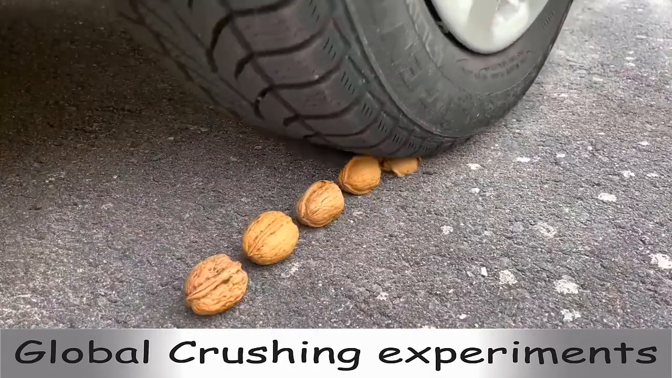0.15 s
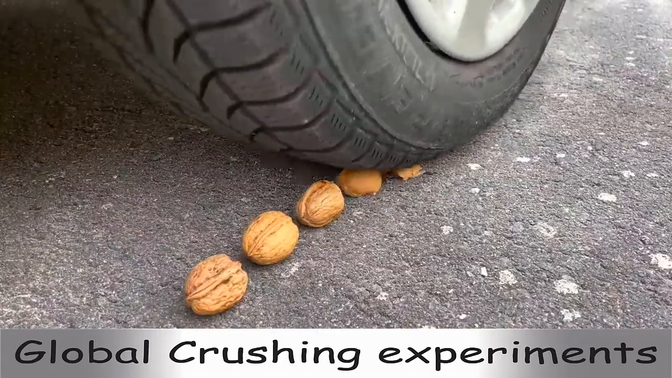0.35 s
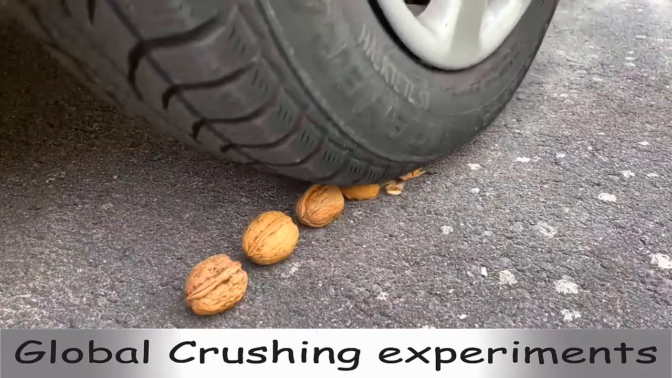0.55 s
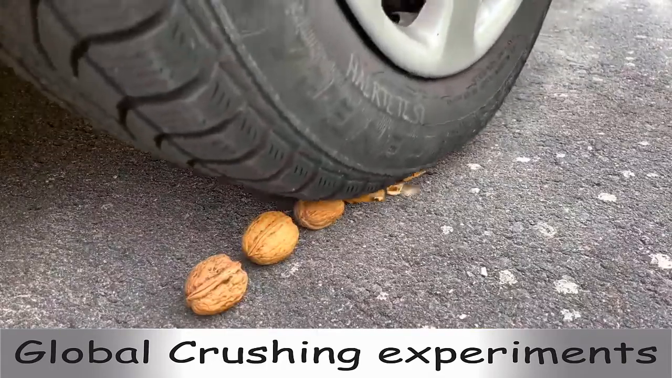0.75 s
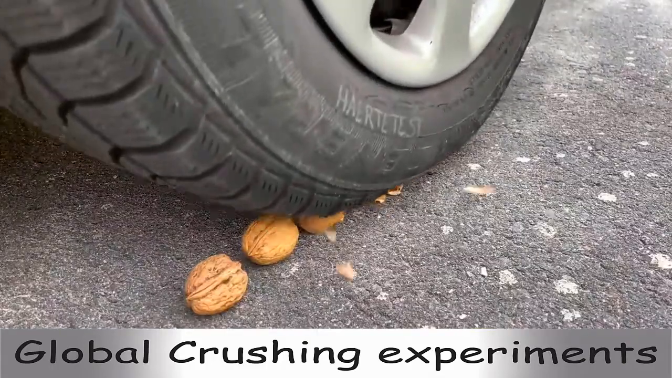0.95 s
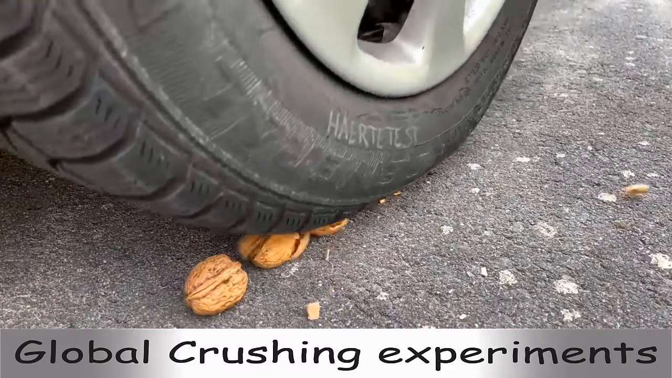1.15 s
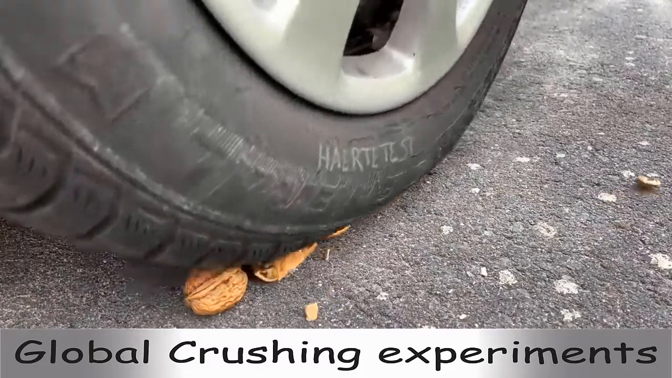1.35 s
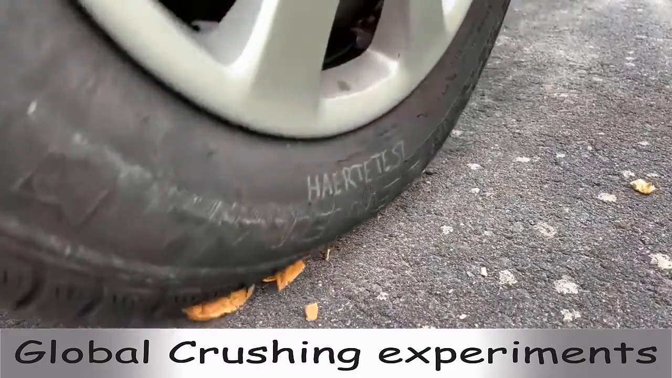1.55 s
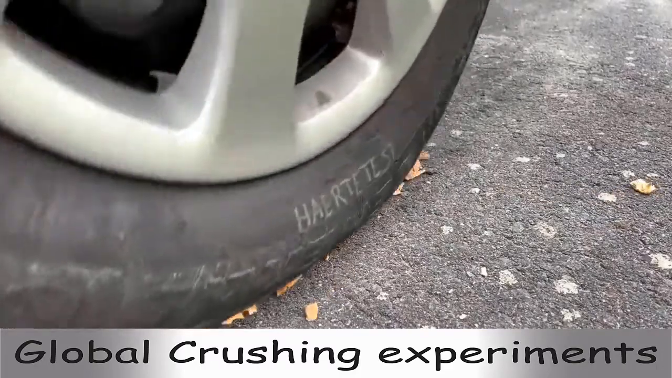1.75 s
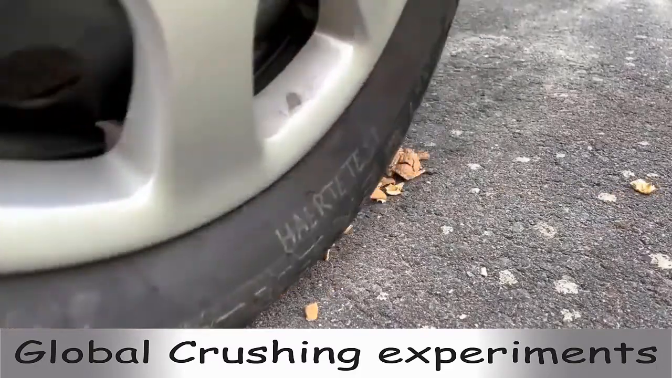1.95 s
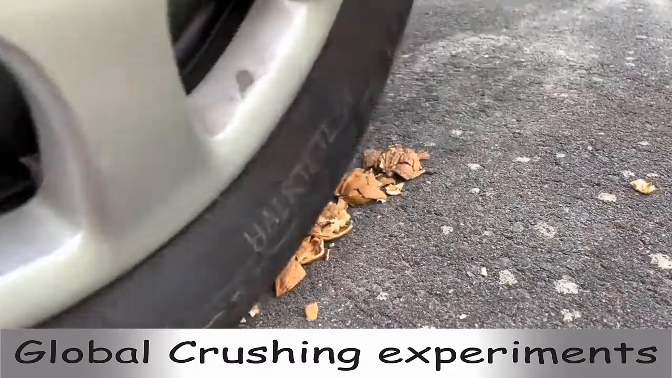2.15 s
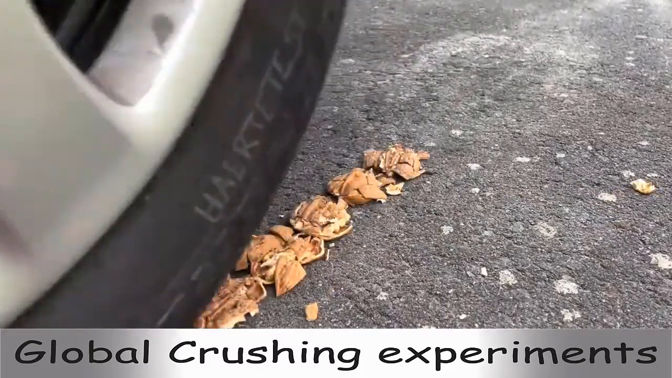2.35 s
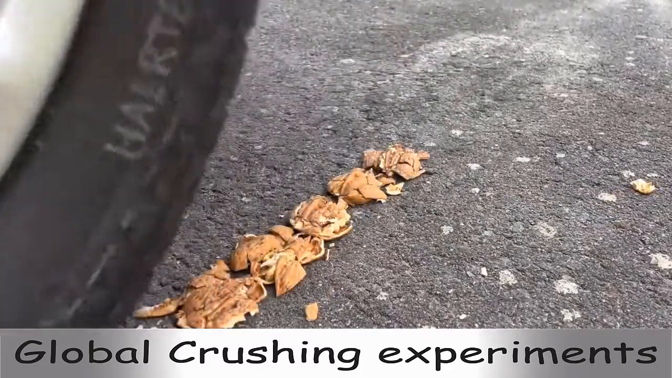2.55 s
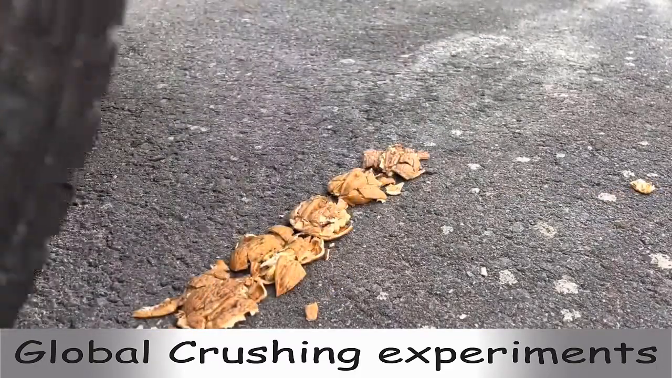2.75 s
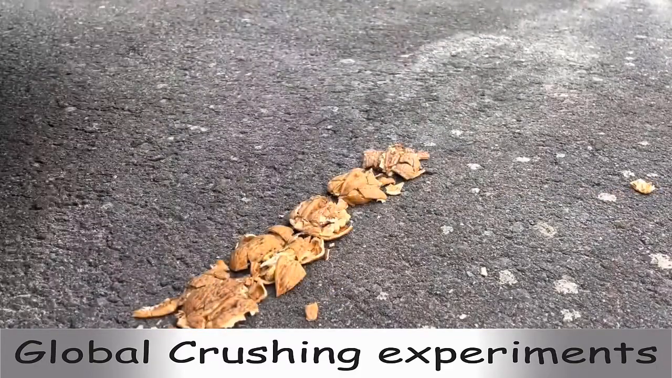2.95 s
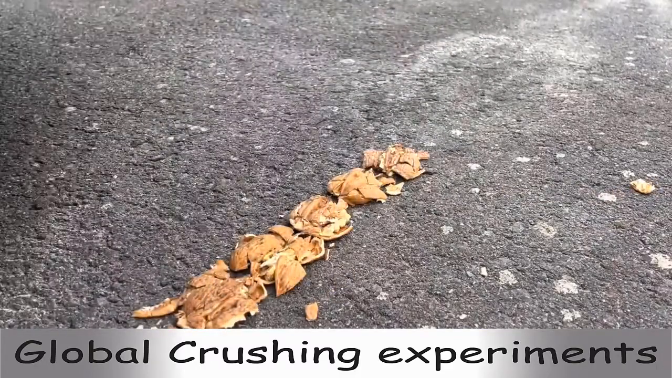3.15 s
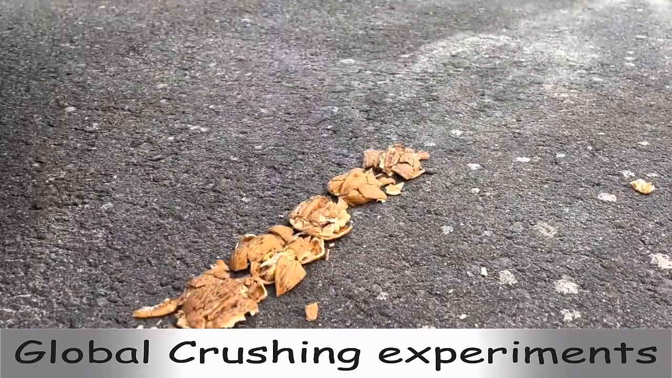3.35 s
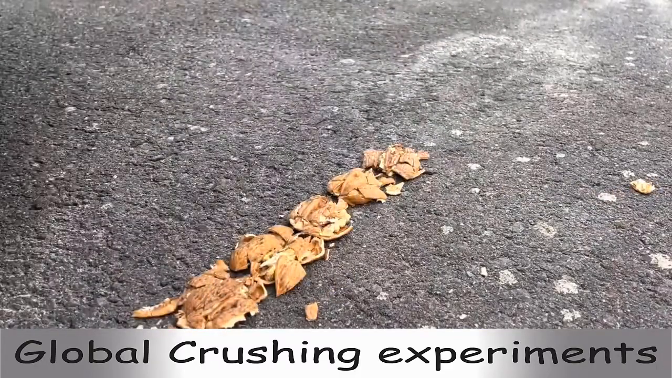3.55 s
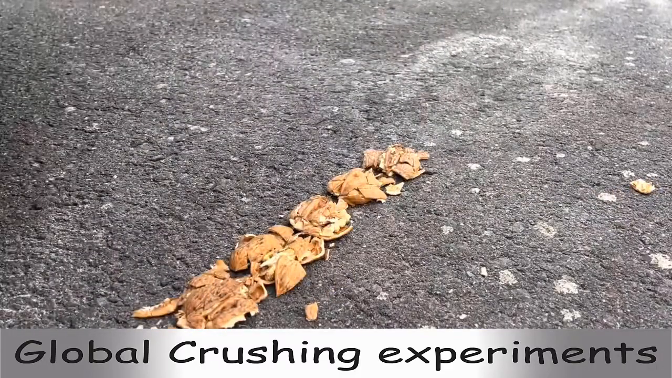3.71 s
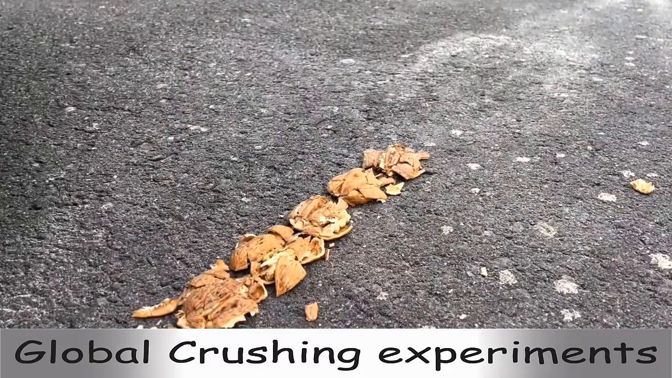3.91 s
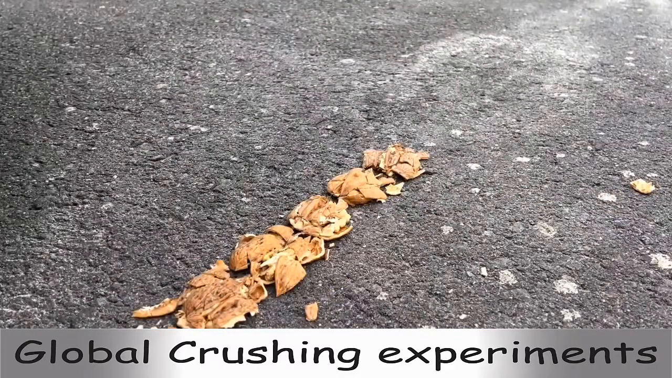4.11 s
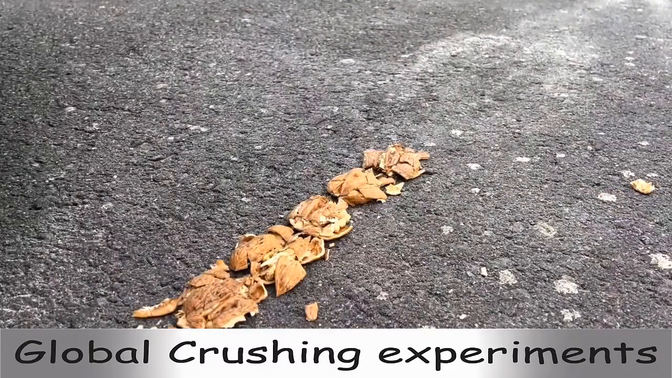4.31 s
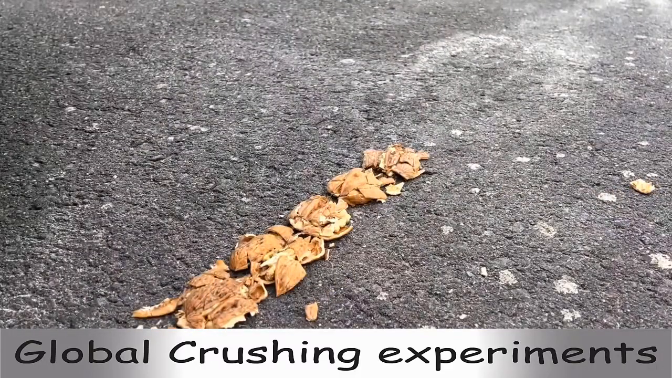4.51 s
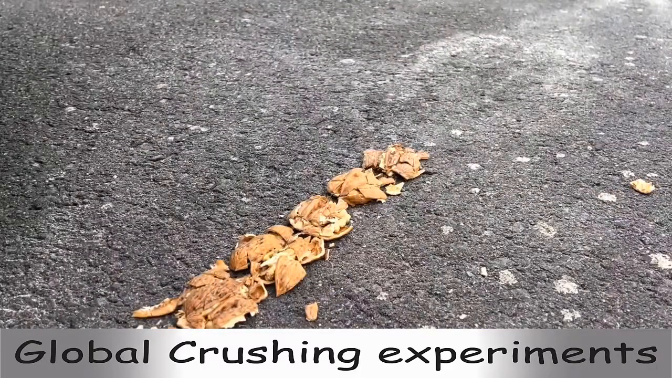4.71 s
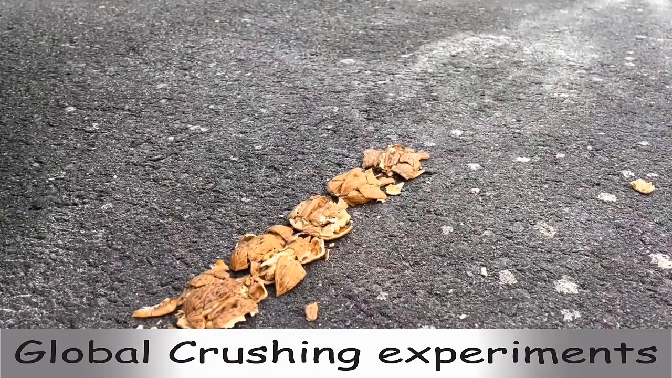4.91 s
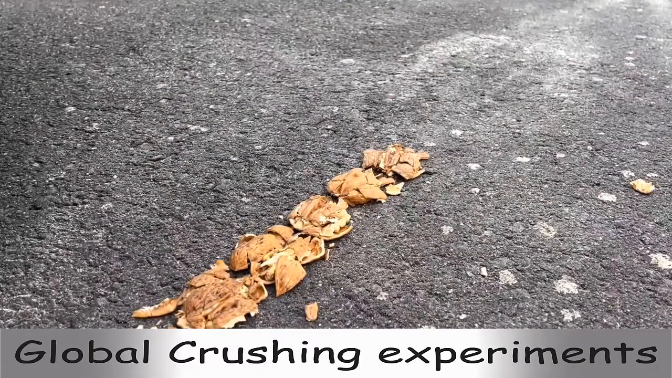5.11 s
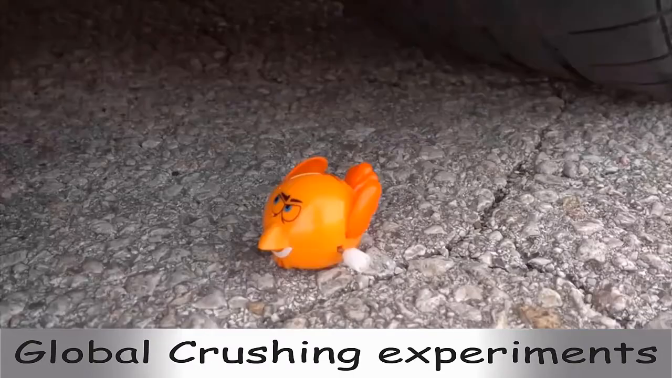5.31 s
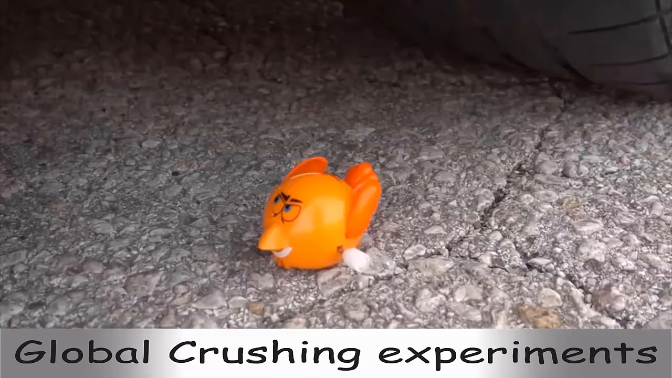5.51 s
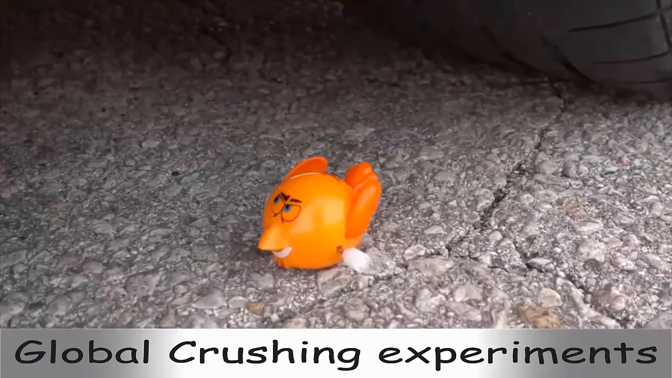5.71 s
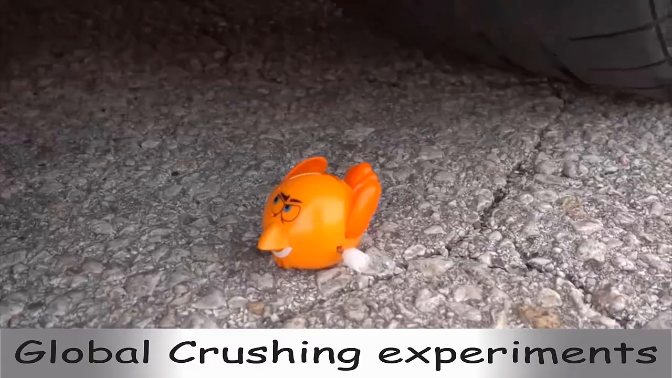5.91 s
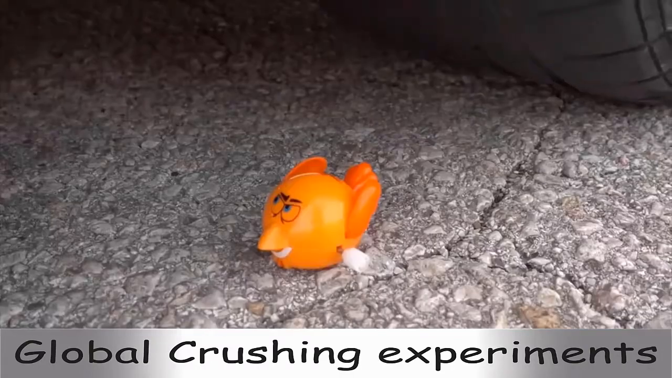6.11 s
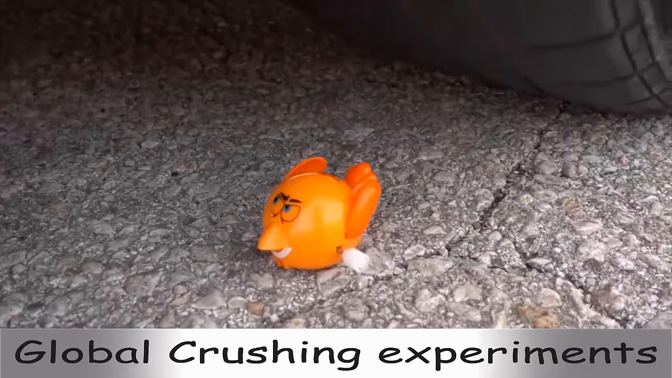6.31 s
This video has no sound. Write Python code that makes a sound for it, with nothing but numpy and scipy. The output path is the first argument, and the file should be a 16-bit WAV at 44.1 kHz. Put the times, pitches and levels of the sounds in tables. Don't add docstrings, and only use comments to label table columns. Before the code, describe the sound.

Loud brittle shell cracks come in irregular clusters, with woody pops, splintering ticks and gritty kernel crumble, one hard knock standing out late. The breaking stops and leaves a soft, throbbing car idle with faint whine and a brief tiny squeak. A short rustle, then the engine is gone and rough low gusts thump a close outdoor microphone over faint distant wind.

```python
import sys
import numpy as np
from scipy import signal
from scipy.fft import rfft, irfft, next_fast_len
from scipy.io import wavfile
from scipy.ndimage import uniform_filter1d, minimum_filter1d

SR = 44100
rng = np.random.default_rng(int(sys.argv[2]) if len(sys.argv) > 2 else 0)


def linear_from_db(decibels):
    return 10 ** (np.asarray(decibels, float) / 20)


def pcm_store(signal):
    levels = np.round(np.clip(np.atleast_2d(signal), -1, 1) * 32767)
    wavfile.write(sys.argv[1], SR, levels.astype(np.int16).T)


N = 284974
T = np.arange(N) / SR

# (frequency [Hz], level [dB])
SNAP_SPECTRUM = [(900, -10), (1500, -7.5), (2000, -4.5), (2800, -4), (4700, -1.5), (6500, -2.5),
                 (9000, 0.5), (12000, -5.5), (15500, -10)]
# (frequency [Hz], level [dB])
TAIL_TREBLE = [(2500, 2.5), (6000, -5), (12000, -6)]
# (start [s], end [s])
CHANGE_S = (5.3405, 5.3958)
NUT_HZ = 981.6
LEAVE_S = 1.8


def evened(x):
    return x / np.sqrt(np.mean(x ** 2, axis=-1, keepdims=True) + 1e-20)


def read(points, hz, axis=1):
    columns = np.transpose(points)
    return np.interp(np.log(hz + 1), np.log(columns[0] + 1), columns[axis])


def curves(rows):
    s, *columns = np.transpose(rows)
    return [np.interp(T, s, c) for c in columns]


def window(t0, t1, edge):
    return np.clip((T - t0) / edge, 0, 1) * np.clip((t1 - T) / edge, 0, 1)


def add(mix, s, sound):
    part = mix[..., round(s * SR):][..., :sound.shape[-1]]
    part += sound[..., :part.shape[-1]]


def colour(x, points):
    size = x.shape[-1]
    return irfft(rfft(x) * linear_from_db(read(points, np.fft.rfftfreq(size, 1 / SR))), size)


def noise(points):
    return evened(colour(rng.standard_normal((2, next_fast_len(N))), points)[:, :N])


def drift(hz):
    size = next_fast_len(N)
    z = rfft(rng.standard_normal(size))
    return evened(irfft(z * np.exp(-(np.arange(len(z)) * SR / N / hz) ** 2), size)[:N])


def ports(pair, table, right_db):
    size = next_fast_len(N)
    hz, z = np.fft.rfftfreq(size, 1 / SR), rfft(pair, size)
    same = np.clip(read(table, hz), 0, 1)
    shared = same * z[0] * np.exp(-1j * read(table, hz, axis=2))
    right = shared + np.sqrt(1 - same ** 2) * z[1]
    return np.array([pair[0], linear_from_db(right_db) * irfft(right, size)[:N]])


def breaks():
    # (time [s], snap [dB], brightness [dB], ring [dB], ring frequency [Hz])
    splits = [(0.052, -12.5, -6.5, -29, 1201), (0.0825, -15.5, -2, -21, 1275),
              (0.0916, -19, -0.5, -24, 777), (0.1241, -16, -3.5, -37.5, 761), (.165, -23, 2, -32.5, 854),
              (0.3479, -23, -9.5, -27.5, 1233), (0.4858, -23.5, -2, -32, 1132),
              (0.63, -15.5, -9.5, -19.5, 1004), (0.651, -15.5, -3, -19.5, 434.4),
              (0.674, -12, -9, -25, 450.4), (0.783, -14.5, 1.5, -19.5, 765.3),
              (1.0395, -13.5, 12, -30.5, 1545), (1.08, -16.5, 3.5, -24.5, 846),
              (1.2136, -15.5, -7.5, -12, 1025), (1.3888, -12, 2.5, -15.5, 450),
              (1.404, -24.5, -1.5, -29.5, 1029), (1.599, -28, -4, -24, 1205),
              (1.6255, -20, -8.5, -16, 1190), (1.636, -18.5, -2, -8, 956), (1.6429, -32.5, -8, -25, 920),
              (1.6838, -21.5, -1.5, -23.5, 1139)]
    # (time [s], snap [dB], brightness [dB], ring [dB])
    snaps = [(0.2932, -25, -9.5, -27.5), (0.2974, -18, -4, -26.5), (0.3611, -21, -3, -25.5),
             (0.4017, -18, -3, -28), (.424, -25, -8.5, -35), (0.5425, -27.5, -4, -36),
             (0.5548, -13, 4.5, -15.5), (0.6343, -17, -5.5, -16.5), (0.777, -16.5, 1.5, -17.5),
             (0.8004, -25.5, -2, -30), (0.8286, -27.5, 3, -28.5), (1.0007, -16.5, -1.5, -24),
             (1.227, -32.5, 2, -32.5), (1.32, -36.5, -1, -27.5), (1.4339, -26, 1, -42.5),
             (1.45, -25, 0, -26.5), (1.5221, -20, -2, -18), (1.5364, -23, 2.5, -31),
             (1.7244, -28.5, -13, -22.5), (1.7388, -22, -5, -16.5), (1.7446, -21, 0.5, -35),
             (1.78, -23.5, 0.5, -27.5), (1.8026, -31.5, -3, -32.5)]
    # (time [s], snap [dB], ring [dB], ring frequency [Hz])
    tears = [(0.0402, -25, -38.5, 920), (0.0491, -23.5, -29.5, 1180), (0.0634, -15.5, -18, 859),
             (0.2233, -18, -16, 969), (0.236, -20.5, -23, 1427), (0.282, -30, -39, 925),
             (0.6174, -15, -17.5, 794), (0.6649, -21.5, -34.5, 793.5), (0.6953, -27, -46.5, 920),
             (0.876, -33, -33, 700), (1.0438, -12.5, -22.5, 700), (1.055, -27.5, -24.5, 740),
             (1.2, -43, -55.5, 1143), (1.5695, -18, -12, 952), (1.6515, -33.5, -26, 1138),
             (1.835, -36.5, -35.5, 942)]
    # (time [s], snap [dB], brightness [dB])
    chips = [(0.1867, -20, 2), (0.2577, -27, -3), (0.2735, -26, 5.5), (0.429, -28.5, 4.5),
             (0.505, -25.5, 2.5), (0.5248, -30.5, 10.5), (.707, -16.5, 0), (.733, -21.5, 2.5),
             (0.7683, -25.5, 7.5), (.9213, -40, 9), (0.952, -35.5, 3.5), (.648, -14.5, -1.5),
             (1.2418, -32, 1.5), (1.421, -30, 0.5), (1.728, -31, 5), (1.8311, -21, 7.5), (1.9047, -32, 7.5)]
    # (time [s], snap [dB], ring [dB], ring frequency [Hz])
    crumbs = [
        (2.731, -66, -55.5, 1500),
        (2.847, -69, -59, 1893),
        (3.109, -60, -59, 2073),
        (6.416, -43, -28, 620),
        (6.4555, -68, -22, 516),
    ]
    nut_hz = NUT_HZ * (1 + 0.024 * rng.standard_normal(len(snaps)))
    rows = [row + (1.1,) for row in splits]
    rows += [row + (hz, 1.1) for row, hz in zip(snaps, nut_hz)]
    for s, db, ring_db, hz in tears:
        bright_db = -1 - 0.06 * (db - ring_db)
        rows.append((s, db, bright_db, ring_db, hz, 1.9))
    rows += [(s, db, bright_db, db - 20.5, NUT_HZ, 1) for s, db, bright_db in chips]
    rows += [(s, db, -23, ring_db, hz, 3.8) for s, db, ring_db, hz in crumbs]
    return rows


def splinters():
    # (time [s], snap [dB], brightness [dB],
    # ring relative to snap [dB])
    ticks = [(0.0146, -40, -6, -13.5), (0.0333, -39.5, 29, -16), (0.0886, -18.5, 0, -9.5),
             (.0957, -20, -0.5, -2), (.0995, -25.5, -1, -6), (.252, -29.5, 1, -9.5), (.315, -37, 0, -12),
             (0.341, -37.5, 1.5, -11), (.438, -36, 2, -11), (.574, -39, 4, -7.5), (.604, -42.5, -7, -11),
             (0.622, -21.5, -2, -8), (.626, -15, -1, -5), (0.637, -25, 0, -5.5), (.657, -21.5, 2.5, -5.5),
             (.721, -34.5, -6.5, -6), (0.7525, -34.5, 1.5, -11), (.763, -31.5, 0, -7.5),
             (0.7817, -17, 0, -15.5), (.790, -21.5, -5, 1), (.840, -40.5, 8, -12), (.913, -42.5, 1, -3),
             (0.9447, -40, 6, -11), (.960, -40, 7, -12.5), (0.9712, -38.5, -0.5, -19.5),
             (1.0145, -35.5, 5, -8.5), (1.0495, -27.5, -2.5, 4), (1.07, -32, 2, -6), (.8746, -22.5, -2, -1),
             (1.174, -43.5, 3, -15), (1.240, -36, 8.5, -7.5), (1.263, -36.5, -3.5, -7.5),
             (1.292, -41.5, 3.5, -5), (1.378, -37, 1.5, 4), (1.384, -28.5, 2, 3.5), (1.3862, -18.5, 3, -10),
             (1.396, -27.5, -5.5, 8.5), (1.424, -23, -2.5, -12), (1.4418, -31.5, 1, -11.5),
             (1.483, -39, 2.5, -15), (1.564, -27, 3.5, -3.5), (1.588, -35, -0.5, -6), (1.640, -26, 2, -4),
             (1.767, -47, -8, -14.5), (1.773, -42.5, -2, -12.5), (1.839, -27.5, 4, -15.5),
             (1.846, -41.5, 7, 5.5), (2.941, -57, -1, -5), (1.908, -37, -19, -19),
             (.0476, -22, -1.5, -24), (.0565, -23, 9, -10), (.0715, -33, -12, 5), (.6155, -26, 2, -12),
               (.704, -22, 2, -22), (.82, -40, -4, -8), (.8845, -52, 15, -16), (1.0465, -25.5, -9, 5),
               (1.0765, -23.5, -1, -6), (1.147, -47.5, 7, -9.5), (1.165, -43, 8.5, -14.5),
               (1.2355, -45, 7, 3), (1.267, -41, 1, -12), (1.6385, -32.5, -4.5, 12.5),
               (2.671, -67.5, 2, -10), (2.909, -66, -6, 0), (3.086, -68, -6, 1.5), (6.394, -58, -4.5, 6),
               (6.4175, -51, 6, -6), (6.426, -53, -7, 2)]
    return [(s, db, bright_db, db + ring_db, NUT_HZ, 0.8) for s, db, bright_db, ring_db in ticks]


def crack(s, snap_db, bright_db, ring_db, hz, ms):
    t = (np.arange(3072) - 512) / SR
    before, after = np.minimum(t, 0), np.maximum(t, 0)
    spit = np.exp(before / 0.00039 - after / (ms * 0.00094))
    scatter = linear_from_db(-17.5 - 60 * after / 0.096 + 60 * before / (0.018 * ms))
    tilt = [(4000, -0.45 * bright_db), (11000, 1.5 * bright_db)]
    peaks_db = np.linspace(2.5, 6, num=16) * rng.standard_normal(16)
    shard = np.transpose([np.geomspace(1500, 15000, num=16), peaks_db])
    hiss = colour(rng.standard_normal((2, len(t))), SNAP_SPECTRUM)
    hiss = evened(colour(colour(hiss, tilt), shard)).clip(-2, 2)
    size = np.sqrt(np.mean((spit + scatter) ** 2))
    snap = evened(hiss * spit + colour(hiss, TAIL_TREBLE) * scatter) * size

    lag = t - 0.00058
    before, after = np.minimum(lag, 0), np.maximum(lag, 0)
    hollow = [(0.04 * hz, -14), (0.26 * hz, -3), (hz, 0), (1.19 * hz, -4), (2.0 * hz, -18), (5 * hz, -50)]
    thud = evened(colour(rng.standard_normal((2, len(t))), hollow)) * linear_from_db(-2.5 - 60 * after / 0.037)
    fade = linear_from_db(-60 * after / 0.016) + linear_from_db(4 - 60 * after / 0.0088)
    ring = np.sin(2 * np.pi * (hz * after + 0.091 * rng.random((2, 1)))) * fade
    knock = evened((ring + thud) * np.exp(before / 0.00026)) * 0.16
    return s - 512 / SR, linear_from_db(snap_db + 2.0) * snap + linear_from_db(ring_db + 3.0) * knock


def pings():
    # (time [s], level [dB], frequency [Hz])
    freed = [(0.0522, -23, 3940), (0.064, -27.5, 1620), (0.1246, -18, 4705), (0.2237, -14.5, 1910),
             (0.402, -18.5, 5800), (.486, -18, 5400), (0.555, -17.5, 3500), (.6178, -13.5, 1900),
             (.6305, -15, 4830), (0.6492, -11.5, 2090), (.707, -20.5, 5920), (0.7774, -17, 5900),
             (0.7822, -15, 3400), (0.875, -20, 4870), (1.0004, -12.5, 4550), (1.043, -11.5, 1790),
             (1.079, -12.5, 5700), (1.2132, -17, 3130), (1.388, -13, 1945), (1.424, -25, 6900),
             (1.522, -13, 5900), (1.5683, -21, 6200), (1.638, -22, 6280), (1.6823, -21, 4400)]
    out, t = np.zeros(N), np.arange(1500) / SR
    for s, db, hz in freed:
        tone = np.sin(2 * np.pi * hz * t) * np.clip(t / 0.0002, 0, 1)
        add(out, s, linear_from_db(db - 60 * t * hz / 33) * tone)
    return out


def aftermath(s, db, fade_s, rest_db):
    jolts = np.bincount(np.round(s * SR).astype(int), linear_from_db(2 * db), N)
    decay = np.exp(-2 / (fade_s * SR))
    return np.sqrt(signal.lfilter([1], [1, -decay], jolts) + linear_from_db(2 * rest_db))


def grit(rows):
    opening = (0.0027, -2.5, 0, -27, 0, 0)
    s, snap_db, _, ring_db, *_ = np.transpose(rows + [opening])
    fizz = aftermath(s, snap_db - 26.5, 0.016, -54)
    grind = aftermath(s, ring_db - 19.5, 0.019, -57)
    size = linear_from_db(3 * np.minimum(rng.exponential(1, N), 4)) * (rng.random(N) < 900 / SR)
    grains = evened(0.5 + signal.lfilter([1], [1, -0.975], size))
    crunch = noise([(250, -21.0), (600, -2.0), (1000, 3.0), (1600, -17), (2500, -25.0)])
    sound = fizz * colour(noise(SNAP_SPECTRUM), TAIL_TREBLE) + grind * crunch
    return window(-1, 1.92, 0.059) * grains * sound


def knocks():
    # (time [s], level [dB], direction [+-1], fade [ms])
    hits = [
        (0.2215, -14, 1, 5.5),
        (0.6733, -12.5, 0.91, 14),
        (1.3876, -3.5, -1.2, 14),
        (1.632, -17, -0.45, 1.6),
    ]
    # (time [s], level [dB], frequency [Hz], length [s])
    tyre_drop = (1.47, -30, 48., .17)
    out, t = np.zeros(N), np.arange(90, 4000) / SR
    for s, db, way, ms in hits:
        sweep = np.cos(np.pi * np.log(t / 3e-3) / np.log(1.52))
        fade = np.exp(-(t - 3e-3) / (ms * 0.00093)) * np.clip((t - t[0]) / 0.0015, 0, 1)
        add(out, s + t[0], way * linear_from_db(db) * sweep * fade)
    s, db, hz, length = tyre_drop
    t = np.arange(round(length * SR)) / SR
    add(out, s, linear_from_db(db) * np.sin(2 * np.pi * hz * t) * np.hanning(len(t)))
    return np.array([out, out])


def pipe(hz):
    # (frequency [Hz], half width [Hz])
    modes = [(278, 14), (385, 12), (520, 16)]
    return 0.3 + sum(1 / np.hypot(1, (hz - f) / width) for f, width in modes)


def firing_orders(hz, turns, exhaust_db, intake_db):
    # (multiple of the firing rate [1], level [dB])
    orders = [(1, -9.5), (2, -10), (3, -4.5), (4, -13.5), (5, 0.5), (6, -1.5), (7, -19.5), (8, -26.5),
              (9, -12), (10, -21), (11, -13.5), (12, -25), (13, -23), (14, -23), (15, -17.5), (10.5, -19),
              (5.5, -22.5), (2.5, -21), (19, -24), (20, -19), (21, -29.5)]
    limp = 1 + 0.45 * np.cos(np.pi * turns)
    hum = np.zeros((2, N))
    for k, db in orders:
        level_db = exhaust_db + db + 0.7
        phase = -0.24
        if k == 6:
            level_db = intake_db + db + 3.0
            phase -= 0.24
        if k == 2:
            phase += 0.38
        sway = np.array([[0], [0.25]]) + phase + 0.0099 * np.sqrt(k) * drift(31.0)
        gain = np.sqrt(2) * linear_from_db(level_db + 1.5 * drift(13.0))
        if k > 9:
            gain = gain * pipe(k * hz) / pipe(k * hz[round(4 * SR)])
        if k > 18:
            gain = gain * limp
        hum += gain * np.cos(2 * np.pi * (k * turns + sway))
    return hum


def exhaust_noise(turns, exhaust_db):
    # (frequency [Hz], level [dB])
    throb = [(30, -12.5), (100, -5.5), (300, -14), (450, -23.5), (530, -15.5), (620, -31), (1030, -28.5),
             (3000, -91.5)]
    pulse = (1 + 0.31 * np.cos(2 * np.pi * turns)) ** 1.5
    return pulse * linear_from_db(exhaust_db - 8.5) * noise(throb)


def clatter(noise_db):
    # (frequency [Hz], level [dB])
    belts = [(400, -26), (1150, -29), (1430, -36.5), (1800, -35), (2150, -41), (2500, -39), (3500, -47),
             (5600, -51), (8000, -57), (10000, -54), (12300, -58), (12900, -101.5)]
    return linear_from_db(noise_db - 0.5 + 1.1 * drift(5.8)) * noise(belts)


def shield_rattle():
    buzz = 0
    for f, db in ((1140, 7), (1740, -5)):
        buzz = buzz + linear_from_db(db) * noise([(f * 0.3, -70), (f * 0.96, -20), (f, 0), (f * 1.13, -20), (f * 3, -80)])
    return buzz * linear_from_db(-68.5 + 2.6 * drift(14.0)) * window(LEAVE_S, 2.61, 0.11)


def brake_squeak():
    # (frequency [Hz], level [dB], length [s])
    partials = [
        (1433, -52.5, 0.024),
        (2880, -62.5, 0.019),
        (4320, -66, 0.034),
        (7200, -82.5, .012),
    ]
    out, start = 0, 3.522
    for f, db, length in partials:
        tone = np.sin(2 * np.pi * f * T) * window(start, start + length, 0.0048)
        out = out + linear_from_db(db) * tone * linear_from_db(3.4 * drift(90.0))
    return out


def alternator(noise_db):
    # (time [s], frequency [Hz])
    pitch = [
        (0, 5930),
        (2.42, 5925),
        (2.6, 5895),
        (2.67, 5750),
        (2.84, 5885),
        (5.4, 5880),
    ]
    spin = 2 * np.pi * (np.cumsum(curves(pitch)[0]) / SR + 0.15 * drift(7.4))
    first = linear_from_db(noise_db - 27.5 + 4 * drift(4.5)) * np.sin(spin)
    return first + linear_from_db(-91.5 + 4 * drift(2.5)) * np.sin(2 * spin)


def engine():
    # (time [s], firing rate [Hz], exhaust level [dB], intake level [dB])
    idle = [(0, 27, -43, -44.5), (.62, 26.68, -47, -44), (1.03, 25.3, -43, -46.5), (1.4, 26.52, -45, -63),
            (1.75, 24.78, -44.5, -48), (1.95, 25.37, -45, -41), (2.08, 26.45, -41, -42),
            (2.3, 27.64, -42, -40.5), (2.47, 26.51, -43, -42.5), (2.71, 25.21, -46.5, -46.5),
            (3.39, 25.98, -41, -43), (4.89, 26.19, -43.5, -47), (5.34, 26.05, -45.5, -47)]
    # (frequency [Hz], likeness [0-1], left lead [rad])
    likeness = [(99.6, 0.97, 0.24), (364, 0.75, 0.3), (700, 0.32, 0.77), (1452, 0.78, 3.4),
                (2164, 0.23, 3.8), (3400, 0.22, 1.1), (6640, 0.29, 7.5), (7840, 1, 2.8), (8640, 1, 4),
                (9500, 0.2, 1.2), (12000, .8, .05)]
    hz, exhaust_db, intake_db = curves(idle)
    turns = np.cumsum(hz) / SR
    turns = turns - turns[round(3.589 * SR)]
    noise_db = -59 + 5.5 * np.exp(-np.maximum(T - LEAVE_S, 0) / 0.73)
    car = firing_orders(hz, turns, exhaust_db, intake_db) + exhaust_noise(turns, exhaust_db)
    car = car + clatter(noise_db) + shield_rattle() + brake_squeak()
    both = ports(car, likeness, 0.3) + np.sqrt(2) * alternator(noise_db)
    return window(-1, CHANGE_S[1], 0.023) * both


def scene_change():
    # (hiss level [dB], right relative to left [dB], closing step [dB])
    levels = (-40, -9, -26)
    # (frequency [Hz], level [dB])
    rustle = [(200, -4), (600, -12), (1900, -14.5), (5000, -27.5), (9500, -30.5), (14500, -27)]
    db, right_db, step_db = levels
    lean = np.clip((T - CHANGE_S[1]) / 0.013 + 1, 0, 1)
    hiss = linear_from_db(db + 1.8 * drift(149.0)) * noise(rustle) * linear_from_db([[0], [right_db]])
    return window(*CHANGE_S, 1 / SR) * (hiss - linear_from_db(step_db) * lean)


def wind_force():
    # (start [s], length [s], level [dB], centre frequency [Hz])
    gusts = [
        (5.381, 0.066, -44.5, 194),
        (5.483, 0.14, -23, 319),
        (5.618, 0.13, -33, 202.1),
        (5.75, .06, -39, 168.3),
        (5.846, 0.2, -29.5, 174.7),
        (6.104, 0.12, -21.5, 185.9),
        (6.252, 0.061, -24.5, 169),
        (6.372, .13, -28, 169.2),
    ]
    # (time [s], level [dB])
    bursts = [(5.419, -22.5), (5.437, -20), (5.465, -17.5), (5.483, -16), (5.493, -16.5), (5.503, -17.5),
              (5.514, -22.5), (5.525, -25), (5.54, -18.5), (5.558, -20.5), (5.577, -16.5), (5.592, -26),
              (5.607, -33.5), (5.673, -21), (5.706, -19.5), (5.732, -29), (5.831, -21), (5.92, -24),
              (5.98, -24.5), (5.993, -24), (6.006, -26.5), (6.018, -28.5), (6.036, -24.5), (6.058, -25.5),
              (6.078, -27), (6.097, -25), (6.112, -18.5), (6.137, -23), (6.154, -21.5), (6.174, -20),
              (6.217, -23), (6.257, -17.5), (6.292, -20), (6.315, -22.5), (6.327, -28.5), (6.368, -31),
              (6.393, -22.5), (6.424, -26), (6.454, -22)]
    edge = 0.015
    buffet, puffs = linear_from_db(-44), 0
    for s, length, db, _ in gusts:
        buffet = buffet + linear_from_db(db) * window(s - edge / 2, s + length + edge, edge)
    for s, db in bursts:
        puffs = puffs + linear_from_db(db + 3.0) * np.exp(-((T - s) / np.where(T < s, 0.005, 0.009)) ** 2)
    hz, = curves([(s + length / 2, f) for s, length, _, f in gusts])
    return np.hypot(buffet, puffs), hz


def eddies(hz):
    # (frequency [Hz], level [dB])
    buffet_spectrum = [(30, -9.5), (80, 3.5), (250, 2.5), (430, -4.5), (620, -27), (1000, -34),
                       (2500, -90.5)]
    turn = np.exp(2j * np.pi * np.cumsum(hz) / SR)
    r = np.exp(-np.pi * 130 / SR)
    broad = noise(buffet_spectrum)
    band = (turn * signal.lfilter([1 - r], [1, -r], broad / turn)).real
    out = 0.41 * evened(band) + 0.13 * broad
    return out / np.sqrt(uniform_filter1d(out ** 2, 500) + 0.13)


def edge_moan():
    # (start [s], end [s], frequency [Hz], level [dB])
    moans = [
        (5.64, 5.77, 640., -44),
        (6.29, 6.36, 1000., -50),
    ]
    out = 0
    for t0, t1, f, db in moans:
        out = out + linear_from_db(db) * window(t0, t1, 0.02) * noise([(f * 0.6, -85), (f, 0), (f * 1.6, -85)])
    return out


def far_wind():
    # (time [s], roar level [dB])
    swell = [(5.41, -55), (5.6, -56.5), (5.76, -51.5), (5.9, -55.5), (6.3, -54), (6.38, -48.5), (6.46, -48)]
    # (frequency [Hz], level [dB])
    roar = [(300, -2.5), (800, -5), (1400, -6.5), (2000, -16), (3500, -34), (6500, -44), (12000, -77)]
    # (frequency [Hz], level [dB])
    far_hiss = [(2000, 4.5), (3500, 1), (6000, -5.5), (11500, -5.5), (13000, -17), (14500, -38)]
    roar_db, = curves(swell)
    far_db = -75 + 2 * (roar_db - swell[0][1])
    out = linear_from_db(roar_db + 3.5 + 0.7 * drift(12.0)) * noise(roar)
    return out + linear_from_db(far_db + 5.5) * noise(far_hiss)


def wind():
    # (frequency [Hz], likeness [0-1], left lead [rad])
    likeness = [(50, 0.99, 1), (150, 0.91, -0.75), (290, 0.82, -0.54), (493.8, 0.48, -1.3),
                (1000, 0.41, -1.1), (1995, .55, -0.18), (4290, 0.028, -.5)]
    force, hz = wind_force()
    spray = noise([(300, 1.5), (600, 2.5), (1100, -14.5), (3000, -77.0)])
    spray = force ** 2 * (hz / 250) ** 2 * spray
    sound = force * eddies(hz) + spray + edge_moan() + far_wind()
    return ports(window(CHANGE_S[1] - 0.025, 7, 0.0081) * sound, likeness, -0.36)


def scene():
    # (frequency [Hz], likeness [0-1], left lead [rad])
    likeness = [(59.74, 0.98, 0.3), (200, 1, 0.27), (700, .9, 0.5), (1470, 0.8, 0.3), (2754, 0.5, 0.54),
                (5500, 0.99, 1), (7100, 0.99, -1.78), (7740, .95, -2.5), (9406, 0.8, -4),
                (10700, 0.9, -5.5), (12300, 0.4, -6.5), (13890, .9, -8.5), (15000, .8, -8.5),
                (16300, 0.7, -9.5)]
    rows = breaks()
    shells = grit(rows)
    for row in rows + splinters():
        add(shells, *crack(*row))
    left, right = ports(shells + knocks() + pings(), likeness, 0.44)
    shade = linear_from_db(-1.2 - 1.77 * np.minimum(T, 1.75) ** 2) - 1
    right = right + shade * signal.filtfilt(*signal.butter(N=2, Wn=6500, fs=SR), right)
    return np.array([left, right]) + engine() + wind() + scene_change()


def starve(x):
    hz, t, z = signal.stft(x, SR, nperseg=256)
    power = uniform_filter1d(uniform_filter1d(abs(z) ** 2, 9, 1), 3, 2)
    level_db = 10 * np.log10(power + 1e-16)
    loud_db = -minimum_filter1d(-level_db[:, 24:].max(1), 15, origin=4)[:, None]
    margin_db = read([(3000, 70), (5000, 39), (7500, 30), (16000, 31)], hz)[:, None]
    luck = rng.standard_normal((2, 17, len(t) // 4 + 1))
    luck = np.repeat(np.repeat(luck, 8, 1), 4, 2)[:, :len(hz), :len(t)]
    kept = level_db > loud_db - margin_db + 3 * luck
    return signal.istft(z * kept, SR, nperseg=256)[1][:, :N]


def band_limit(x):
    return signal.sosfilt(signal.butter(12, 17000, fs=SR, output="sos"), x)


def record(dry):
    lowpass = signal.firwin(511, 16100, window=("kaiser", 9), fs=SR)
    x = signal.oaconvolve(dry, lowpass[None], "same")
    left, right = signal.lfilter(*signal.butter(1, 22.0, "high", fs=SR), x)
    mid, side = starve(np.array([left + right, left - right]) / 2)
    return band_limit(np.array([mid + side, mid - side]))


dry = scene()
out = record(dry)
pcm_store(out)
```